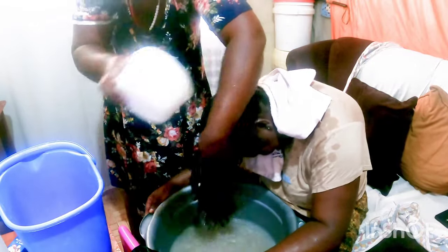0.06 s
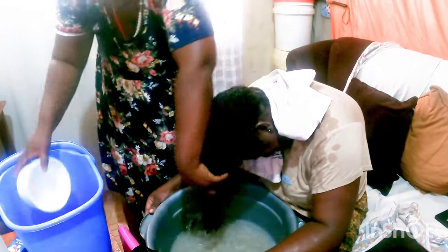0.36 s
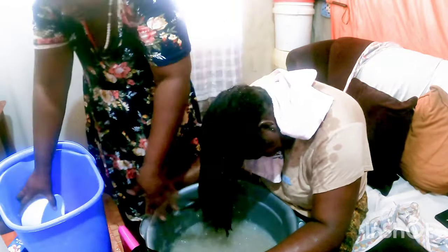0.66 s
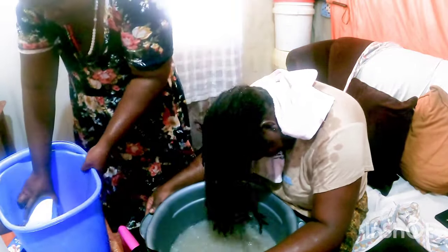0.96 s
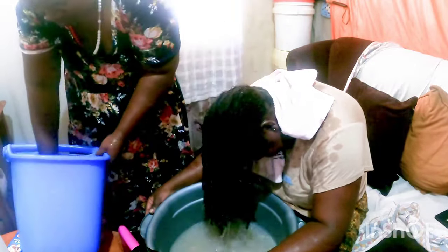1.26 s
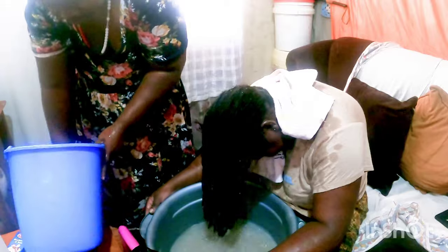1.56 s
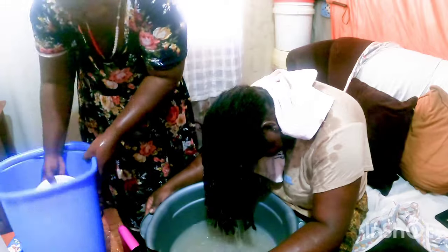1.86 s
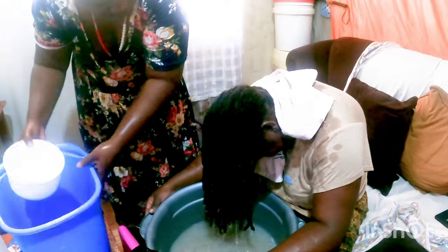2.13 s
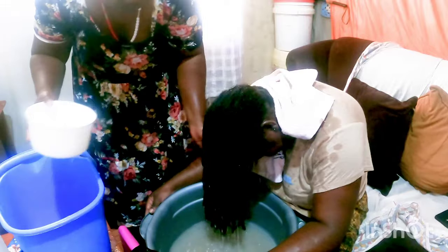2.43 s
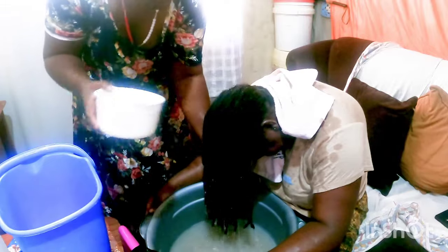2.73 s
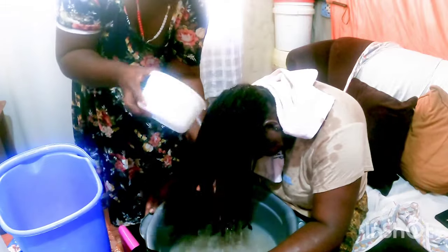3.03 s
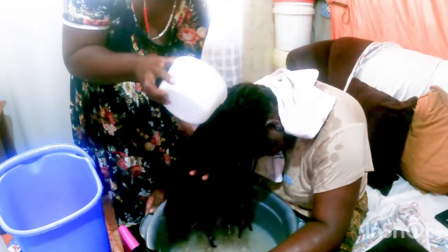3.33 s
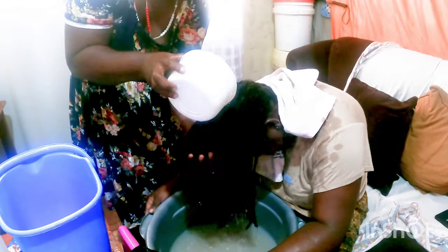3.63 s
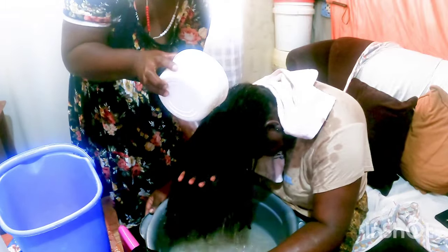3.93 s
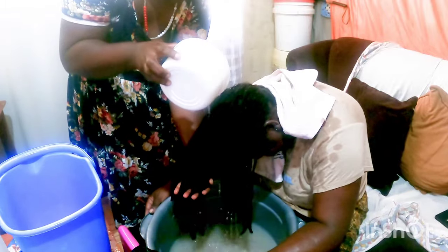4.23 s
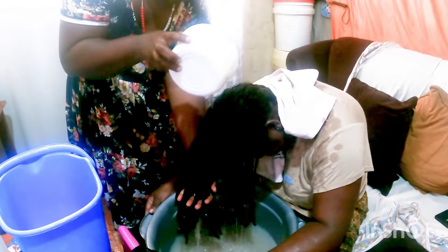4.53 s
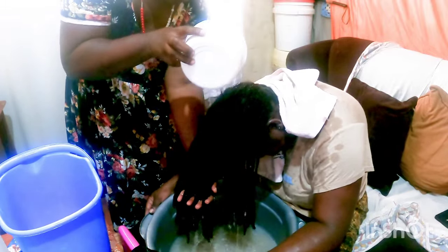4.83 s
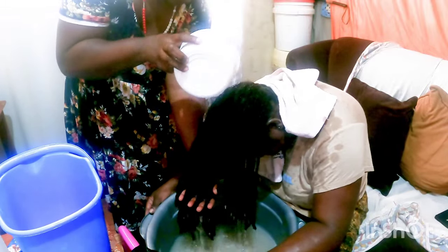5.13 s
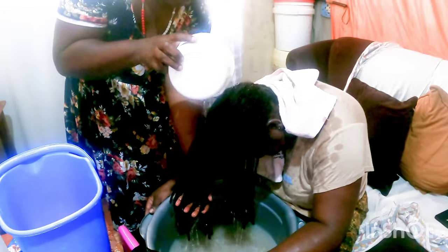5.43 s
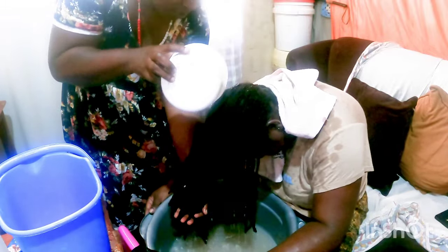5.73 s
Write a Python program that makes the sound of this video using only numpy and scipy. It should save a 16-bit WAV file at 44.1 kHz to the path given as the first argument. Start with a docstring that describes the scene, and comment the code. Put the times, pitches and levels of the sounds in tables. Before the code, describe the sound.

A plastic bowl scoops water, knocking inside a bucket, then water is poured over hair and drips and trickles into a basin.

```python
"""A small furnished room, with a two-port stereo microphone close to a bucket and a wide basin.
A plastic bowl dips into the bucket and knocks against its walls as it scoops. The water is then
poured over long hair and runs off it into the basin: first separate drips, then a thin trickle,
at last a fuller stream. The splashes trap air that rings as bubbles, over a low room tone."""
import sys
import numpy as np
from scipy import signal
from scipy.fft import rfft, irfft
from scipy.io import wavfile
from scipy.ndimage import uniform_filter1d

SR = 44100
rng = np.random.default_rng(int(sys.argv[2]) if len(sys.argv) > 2 else 0)


def to_wav(s):
    """Save 16-bit WAV."""
    ch = np.atleast_2d(s).T  # columns
    pcm = np.round(np.clip(ch, -1, 1) * 32767)  # PCM
    wavfile.write(sys.argv[1], SR, pcm.astype(np.int16))


N = 263892
DIP_S, LIFT_S = 0.24, 2.23   # the bowl enters and leaves the bucket
SHALLOW_RISE, DEEP_RISE = 0.06, 0.025   # bubbles near the surface chirp upward more than deep ones


def from_db(db):
    """Decibels to gain."""
    return 10 ** (np.asarray(db) / 20)


def rms_one(x):
    """Scale to rms 1."""
    return x / np.sqrt(np.mean(x ** 2) + 1e-20)


def in_time(rows):
    """A curve of (time, value) rows, sample by sample."""
    times, values = np.transpose(rows)
    return np.interp(np.arange(N) / SR, times, values)


def by_bin(points, size):
    """Each column of a frequency table, at the bins of a transform."""
    hz, *columns = np.transpose(points)
    return [np.interp(np.log(np.fft.rfftfreq(size, 1 / SR) + 1), np.log(hz), c) for c in columns]


def coloured(x, spectrum):
    """Give a signal a spectrum; rms 1."""
    return rms_one(irfft(rfft(x) * from_db(by_bin(spectrum, N)[0]), N))


def band(x, low_hz, high_hz):
    """Causal band-pass."""
    return signal.sosfilt(signal.butter(2, [low_hz, high_hz], "band", fs=SR, output="sos"), x + 1e-18)


def add(out, start_s, sound):
    """Mix a sound in at a time."""
    at = int(np.clip(start_s * SR, 0, N - 1))
    out[..., at:at + sound.shape[-1]] += sound[..., :N - at]


def placed(pan_db):
    """Left and right gains, pan_db apart."""
    return from_db(np.array([[.5], [-.5]]) * pan_db)


def held(start_s, end_s, attack_s, release_s):
    """An envelope that rises to 1, holds and falls."""
    corners_s = [start_s - attack_s, start_s, end_s, end_s + release_s]
    return np.interp(np.arange(N) / SR, corners_s, [0, 1, 1, 0])


def evened(x, span_s):
    """Hold the level over a short span near 1; the grain stays."""
    power = uniform_filter1d(np.mean(x ** 2, axis=0), int(span_s * SR))
    power = uniform_filter1d(power, int(span_s * SR / 2))
    return x / np.sqrt(np.abs(power) + np.mean(power) / 20)


# Spectrum of the quiet room: frequency_hz, level_db
ROOM_TONE = [(20, -18), (48, 1), (90, -8), (140, -4), (220, -5), (400, -15.5), (800, -27), (14000, -32)]
# Soft low bumps in the background: centre_s, level_db
BUMPS = [(.34, -57), (2.458, -55), (2.783, -59), (4.188, -55), (4.53, -53.5)]
def background(tone_db, bump_db, half_width_s):
    """A low room tone, with a few soft bumps swelling out of it."""
    t = np.arange(N) / SR
    swell = sum(from_db(db + bump_db) * np.exp(-((t - s) / half_width_s) ** 2) for s, db in BUMPS)
    bumps = swell * rms_one(band(rng.standard_normal(N), low_hz=57, high_hz=93))
    air = rng.standard_normal(N) + rng.standard_normal((2, N)) / np.pi   # mostly alike on both sides
    return bumps + from_db(tone_db) * coloured(air, ROOM_TONE)


def room_echoes(x, t60_s, delay_s, low_hz, high_hz):
    """Dense reflections that die away, different on each side of the microphone."""
    t = np.arange(SR // 2) / SR
    decay = from_db(-60 * t / t60_s) * (t > delay_s)
    tail = band(rng.standard_normal((2, len(t))) * decay, low_hz, high_hz)
    tail /= np.sqrt(np.sum(tail ** 2, axis=1, keepdims=True))
    return signal.fftconvolve(x * np.ones((2, 1)), tail, axes=1)[:, :N]


# Resonances of the basin wall: pitch_hz, gain_db
BASIN_MODES = [(1237, -8), (1362, -19), (1644, -6)]
def basin_ring(water, width_hz):
    """The splashing sets the wall of the basin ringing faintly."""
    return sum(from_db(db) * signal.lfilter(*signal.iirpeak(hz, hz / width_hz, fs=SR), water)
               for hz, db in BASIN_MODES)


def reflected(sound, wall_db, reach_s):
    """Each splash lies at its own spot, so the walls answer it with their own delays and directions."""
    out = np.zeros((2, len(sound) + int(reach_s * SR) + 1))
    out[:, :len(sound)] = sound
    for delay, strength, side in rng.random((4, 3)):
        at = int(delay * reach_s * SR)
        gain = from_db(wall_db) * (2 * strength - 1) * np.exp(-delay)
        out[:, at:at + len(sound)] += gain * np.array([[.5 + side], [1.5 - side]]) * sound
    return out


def bubble(hz, cycles, rise):
    """Trapped air rings, rising in pitch as it nears the surface; it fades to 1/e after `cycles`."""
    age = np.arange(int(2.5 * cycles / hz * SR) + 2) * hz / (cycles * SR)
    envelope = np.exp(-age ** 2) * (1 - np.exp(-4 * cycles * age))
    return envelope * np.sin(2 * np.pi * cycles * age * (1 + rise * age))


def swarm(per_s, low_hz, high_hz, cycles, spread_db):
    """Bubbles of random size, strength, life and chirp; a weak flow makes fewer than per_s."""
    out, flow_db = np.zeros((2, N)), in_time(FLOW)
    busy = from_db(flow_db - np.median(flow_db))
    chance, scatter = rng.random((6000, 3)), rng.standard_normal((6000, 4))
    for (when, size, luck), (loud, life, side, chirp) in zip(chance[:int(per_s * N / SR)], scatter):
        if luck > busy[int(when * N)]:
            continue
        hz = low_hz * (high_hz / low_hz) ** size
        ring = bubble(hz, cycles * np.exp(0.42 * life), DEEP_RISE * abs(chirp))
        ring *= from_db(spread_db * min(loud, 2))
        add(out, when * N / SR, reflected(ring, wall_db=-2, reach_s=0.014) * placed(2 * side))
    return evened(out, span_s=0.43)


# Big air pockets in the bucket: start_s, level_db, pitch_hz
GLUGS = [(1.84, -35, 502), (2.134, -31, 254.6), (2.17, -25.5, 504), (2.198, -33, 360), (2.317, -37.5, 450)]
def churn(stir_db, growth_db_per_s, settle_db_per_s):
    """The bowl shoves air under, where it glugs; the stirring builds as the bowl fills, then settles."""
    t = np.arange(N) / SR
    inside_s = np.clip(t, DIP_S, LIFT_S)
    stir = from_db(stir_db + growth_db_per_s * (inside_s - DIP_S) - settle_db_per_s * abs(t - inside_s))
    out = stir * swarm(per_s=140, low_hz=151.6, high_hz=626.5, cycles=6, spread_db=2).mean(axis=0)
    for s, db, hz in GLUGS:
        add(out, s, from_db(db) * bubble(hz, cycles=10.2, rise=DEEP_RISE))
    return out


# Wall modes of the water-filled bucket: pitch_hz, level_db, t60_s
BUCKET_MODES = [(143, -1, 0.24), (183.4, -4, 0.15), (210.4, -1.5, 0.17), (257.3, 5, 0.15),
                (366.2, -6, 0.18), (451, 0, 0.12), (521, 2.5, 0.055), (697, 0, 0.12), (792, 2.5, 0.032),
                (1089, 9, 0.11)]
# Spectrum of the shaken water: frequency_hz, level_db
SLOSH = [(150, -4.5), (350, 2.5), (700, -3), (1150, -4), (1700, -11), (3500, -24.5), (8000, -27.5),
         (16000, -58)]
# Bowl against bucket: start_s, strength_db, favoured_hz, water_db
KNOCKS = [(0.63, -19.5, 216, -34), (1.071, -31.5, 186, -41.5), (1.126, -34, 494, -55),
          (1.137, -32, 210, -40), (1.549, -38.5, 264, -45), (1.643, -14, 169, -34.5),
          (1.897, -30, 298, -57), (2.112, -31.5, 222, -37), (2.169, -32, 195, -37),
          (2.307, -33.5, 207, -50.5)]
def bucket_knocks(reach_octaves, swell_cycles, slosh_s, slosh_db):
    """Each knock rings the wall modes near its own pitch and shakes the water inside."""
    out, shaken, t = np.zeros(N), np.zeros(N), np.arange(SR // 2) / SR
    for s, db, favoured_hz, water_db in KNOCKS:
        ring = 0
        for k, (hz, mode_db, t60_s) in enumerate(BUCKET_MODES):
            share = 1 / (1 + (np.log2(hz / favoured_hz) / reach_octaves) ** 2)
            swell = 1 - np.exp(-t * hz / swell_cycles)   # low modes build more slowly
            decay = from_db(mode_db + rng.normal(0, 1) - 60 * t / t60_s)
            ring += (-1) ** k * swell * share * decay * np.sin(2 * np.pi * hz * t)
        add(out, s, from_db(db) * ring)
        add(shaken, s, from_db(water_db + slosh_db) * np.exp(-t / slosh_s))
    return out + shaken * coloured(rng.standard_normal(N), SLOSH)


def scooping():
    """1 while the water in the bucket is in motion, until the bowl is lifted clear."""
    return held(0, LIFT_S, attack_s=0, release_s=0.037)


def thread(level_db):
    """Before the spurts a thin thread of water runs off the hair and burbles softly around one pitch."""
    burble = swarm(per_s=150, low_hz=1170, high_hz=1500, cycles=13, spread_db=3)
    return from_db(level_db) * held(LIFT_S, SPURTS[0][0], attack_s=0, release_s=0) * burble


def slap(centre_hz, decay_s):
    """A drop slapping the surface, the smaller the brighter; peak 1."""
    t = np.arange(SR // 40) / SR
    burst = rng.standard_normal(len(t)) * np.sqrt(t) * np.exp(-t / decay_s)
    burst = band(burst, centre_hz / 2, min(centre_hz * 2, 11000))
    return burst / np.abs(burst).max()


def offshoots(hz, count, level_db, gap_s, step_octaves):
    """The collapsing crater pinches off a quick run of bubbles that tend to get smaller."""
    out = np.zeros((2, SR // 4))
    for k, (late, size, side) in enumerate(rng.random((count, 3)), 1):
        pitch_hz = min(hz * 2 ** (step_octaves * (k + 4 * size - 2)), 7500)
        ring = from_db(level_db - k) * bubble(pitch_hz, cycles=10, rise=DEEP_RISE)
        add(out, gap_s * (k + late - .5), ring * placed(10 * (side - .5)))
    return out


# Fat drops that trap a bubble: start_s, level_db, pitch_hz, ring_cycles
DROPS = [(0.015, -36.5, 3840, 4), (0.043, -43, 870, 11.3), (0.101, -42.5, 5270, 16), (0.125, -46, 2050, 17),
         (.194, -50, 1705, 15), (0.264, -44, 1030, 4.7), (.352, -40, 4000, 11), (0.361, -51, 1220, 30),
         (0.455, -44, 4700, 7.2), (0.81, -44.5, 1190, 10), (.826, -43.5, 5960, 10),
         (0.875, -37.5, 1223, 19.4), (1.021, -40, 3000, 6.6), (1.952, -39, 1216, 12),
         (2.373, -37.5, 4500, 7.5), (2.508, -33.5, 2740, 3), (2.644, -39, 1406, 8.8),
         (2.704, -39.5, 1915, 15), (2.731, -44.5, 1128, 24), (2.798, -44.5, 1414, 11),
         (2.907, -42, 1402, 21), (2.957, -37.5, 2100, 2.6), (3.063, -40, 3050, 13), (3.203, -38, 1344, 3.9),
         (3.367, -45.5, 1910, 16), (3.427, -36, 1800, 2.3), (3.595, -44.5, 1810, 10),
         (3.684, -37.5, 2580, 4.9), (3.76, -50.5, 1350, 20), (4.248, -48, 2400, 13),
         (4.282, -46.5, 2390, 7.5), (4.473, -37, 3500, 6.2), (4.619, -48, 806, 17), (4.685, -36, 2780, 7.8),
         (4.759, -31.5, 3295, 8.4), (4.776, -36.5, 1620, 6.2), (4.951, -35.5, 2780, 13.5),
         (5.33, -46.5, 1238, 20), (5.412, -34, 1207, 9.6), (5.45, -30.5, 3813, 7.3),
         (5.487, -36.5, 1140, 5.6), (5.775, -40, 4820, 21), (5.805, -37, 2080, 15),
         (5.883, -39.5, 1610, 4.5), (5.942, -50, 900, 23)]
# Drops that smack without a bubble: start_s, level_db, centre_hz
SMACKS = [(.119, -35.5, 3580), (0.865, -44, 5870), (1.071, -35, 3100), (1.292, -36.5, 2570),
          (1.39, -36.5, 2460), (1.479, -33.5, 8100), (1.66, -42, 4500), (1.915, -36, 4300),
          (2.108, -34, 6840), (2.122, -29.5, 3500), (3.154, -35.5, 9200), (4.437, -30, 4000),
          (4.569, -43, 5500), (4.633, -37.5, 6000), (4.656, -40.5, 5000), (5, -47.5, 6950),
          (5.019, -37.5, 2920), (5.145, -37.5, 2860), (5.211, -35, 3630), (5.245, -37.5, 4800),
          (5.608, -45, 7000), (5.665, -38, 5500), (5.692, -35.5, 3950), (5.726, -37.5, 4830),
          (5.823, -41.5, 9000), (5.917, -39, 6000)]
def drips(bubble_db, slap_db, smack_db):
    """Fat drops: all slap the surface, some also ring as a bubble and shed smaller ones."""
    out = np.zeros((2, N))
    for s, db, hz, cycles in DROPS:
        rise = SHALLOW_RISE if s < SPURTS[0][0] else DEEP_RISE
        ring = reflected(bubble(hz, cycles, rise), wall_db=1.5, reach_s=0.013)
        add(out, s, from_db(db + bubble_db) * ring)
        add(out, s, from_db(db + slap_db) * slap(centre_hz=2600, decay_s=0.0025))
        add(out, s, from_db(db) * offshoots(hz, count=4, level_db=-8.5, gap_s=0.01, step_octaves=0.265))
    for s, db, hz in SMACKS:
        smack = reflected(slap(hz, decay_s=0.0016), wall_db=-1, reach_s=0.0079)
        add(out, s, from_db(db + smack_db) * smack)
    return out


def rebounds(relative_db, fade_s):
    """Level of the droplets that each fat drop throws up and that patter back."""
    out, t = np.zeros(N), np.arange(SR // 2) / SR
    for s, db, *_ in DROPS + SMACKS:
        add(out, s, from_db(db + relative_db) * np.exp(-t / fade_s))
    return out


def wash(steady_db, scoop_db):
    """The blur of countless faint bubbles, thickest while the bowl scoops."""
    noise = rng.standard_normal(N) + rng.standard_normal((2, N)) / 2
    blur = rms_one(band(noise, low_hz=970, high_hz=2780))
    return np.hypot(from_db(steady_db), from_db(scoop_db) * scooping()) * blur


def gushes(per_s, size, fade_s, span_s):
    """Envelope of water landing in blobs: each flares up quickly and dies away."""
    blobs = (rng.random(N) < per_s / SR) * size * rng.exponential(1, N)
    age = np.arange(SR // 2) / (fade_s * SR)
    flares = signal.fftconvolve(blobs, age * np.exp(1 - age))[None, :N]
    return evened(1 + flares, span_s)


# Spectrum of the landing droplets: frequency_hz, level_db
SPATTER = [(800, -13), (1500, -4.5), (4800, -6), (7300, -1.5), (8800, -11.5), (11300, -6.5), (13500, -22.5),
           (15500, -63)]
def spatter(per_s):
    """Tiny droplets hit hair and water as a hail of clicks, scattered left and right."""
    clicks = (rng.random(N) < per_s / SR) * rng.choice([-1, 1], N)
    return coloured(clicks * placed(10 * rng.standard_normal(N)), SPATTER)


# Spurts of the full stream into the basin (silent if the end precedes the start): start_s, end_s
SPURTS = [(4.62, 5.06), (5.21, 5.27), (5.38, 5.8), (5.93, 5.8)]
def plunging(scoop_db, pour_db):
    """Share of large bubbles: only the scooping bowl and the full stream drive much air under."""
    pour = sum(held(start, end, attack_s=0.024, release_s=0.02) for start, end in SPURTS)
    return from_db(scoop_db) * scooping() + from_db(pour_db) * pour


# Strength of the splashing, first in the bucket, then in the basin: time_s, level_db
FLOW = [(0, -52), (.18, -61), (.6, -62), (.82, -51), (.95, -61), (1.15, -48), (1.6, -48.5), (2.3, -53.5),
        (3.08, -52.5), (3.33, -57), (3.9, -65), (4.6, -56), (4.78, -47.5), (5.1, -51), (5.6, -48.5),
        (5.98, -55)]
# Fine spray against middling bubbles: time_s, balance_db
SPRAY = [(0, -3.5), (.5, 3.5), (1.2, -12.5), (1.55, -7), (2.3, -9), (3.1, -8), (3.9, 0.5), (4.9, -4),
         (5.98, -7.5)]
def stream():
    """A thick stream drives large bubbles under, a broken one throws fine spray that lands in ticks."""
    flow = np.hypot(from_db(in_time(FLOW)), rebounds(relative_db=-13.5, fade_s=0.02))
    large, fine = plunging(scoop_db=-6.5, pour_db=-4), from_db(in_time(SPRAY))
    gurgle = large * swarm(per_s=170, low_hz=540, high_hz=1130, cycles=9, spread_db=5)
    trickle = swarm(per_s=430, low_hz=1100, high_hz=3600, cycles=8.5, spread_db=3.5)
    fizz = from_db(1.5) * fine * swarm(per_s=520, low_hz=3300, high_hz=6500, cycles=11, spread_db=8)
    small_bubbles = from_db(-2.5 * scooping()) * (trickle + fizz)
    ticks = gushes(per_s=90, size=3.5, fade_s=0.0016, span_s=0.1)
    spray = from_db(-0.5) * fine * spatter(per_s=3900) * ticks
    splashing = gurgle + small_bubbles + spray + wash(steady_db=-14, scoop_db=-4.5)
    return flow * splashing / np.sqrt(1 + fine ** 2)


def scene():
    """Basin and bucket close by, the short echoes of the room behind them."""
    water = stream() + thread(level_db=-64.5) + drips(bubble_db=3, slap_db=-2, smack_db=2)
    bucket = bucket_knocks(reach_octaves=0.57, swell_cycles=0.65, slosh_s=0.024, slosh_db=4.5)
    bucket += churn(stir_db=-61, growth_db_per_s=8.5, settle_db_per_s=58)
    room = from_db(-10) * room_echoes(water, t60_s=0.14, delay_s=0.0096, low_hz=524, high_hz=13700)
    room += from_db(-15) * room_echoes(bucket, t60_s=0.2, delay_s=0.027, low_hz=155, high_hz=5040)[0]
    room += background(tone_db=-59.5, bump_db=2, half_width_s=0.063)
    return water + basin_ring(water, width_hz=36) + bucket + room


# The two microphone ports: frequency_hz, left_minus_right_db, left_lead_rad
PORTS = [(58.5, 3, -0.24), (241, -0.5, -0.92), (546, -1.5, -1.2), (1510, 2.5, -0.83), (4670, 3.5, -0.35),
         (8300, 5, -1.83), (12900, 1.5, -1.34)]
def record(dry):
    """The microphone's two ports differ in level and phase; the treble above 16 kHz is cut."""
    balance_db, lead_rad = by_bin(PORTS, 2 * N)
    ports = placed(balance_db) * np.exp(1j * lead_rad * np.array([[.5], [-.5]]))
    heard = irfft(rfft(dry, 2 * N) * ports)[:, :N]
    return signal.sosfilt(signal.cheby2(10, 60, 16000, fs=SR, output="sos"), heard)


dry = scene()
out = record(dry)
to_wav(out)
```